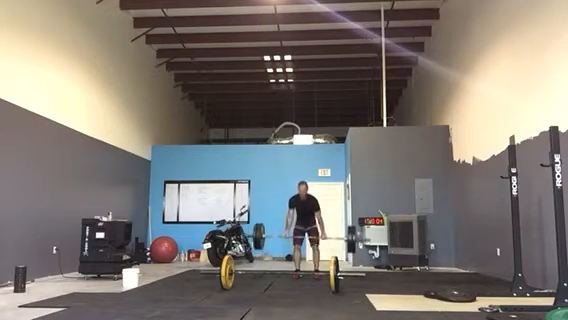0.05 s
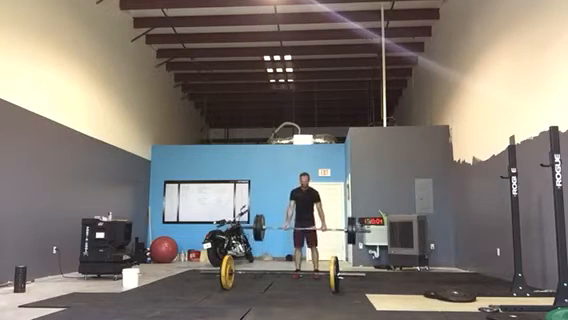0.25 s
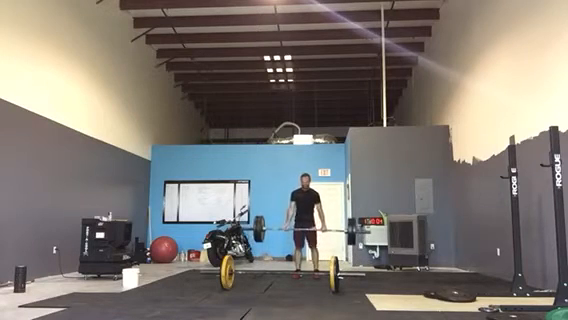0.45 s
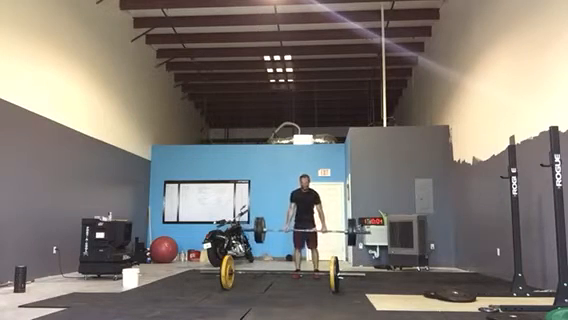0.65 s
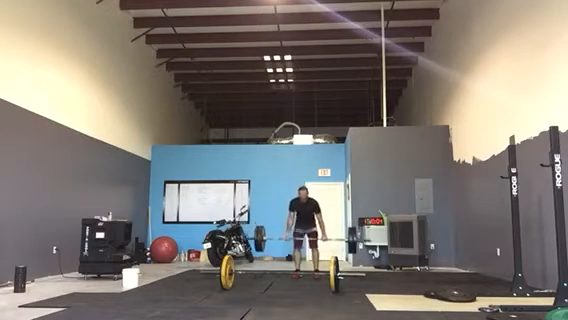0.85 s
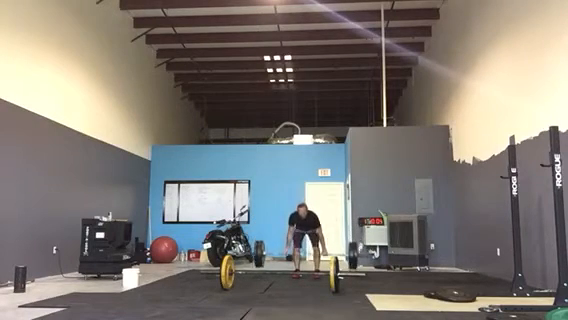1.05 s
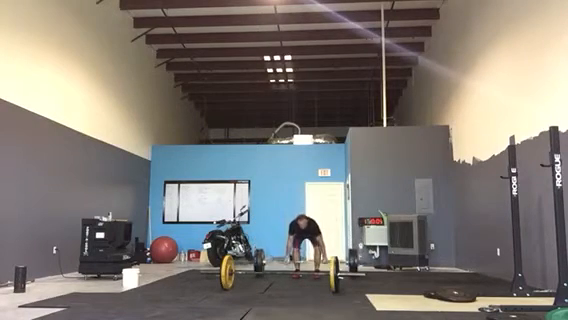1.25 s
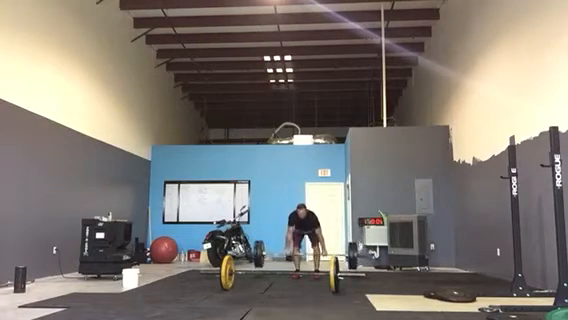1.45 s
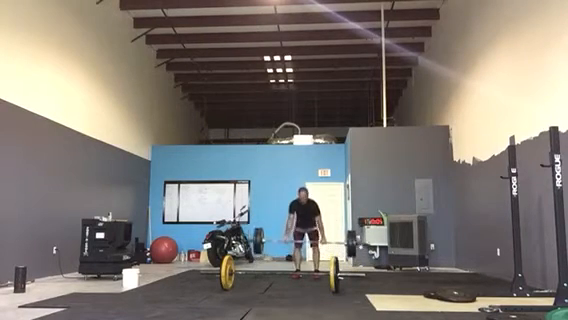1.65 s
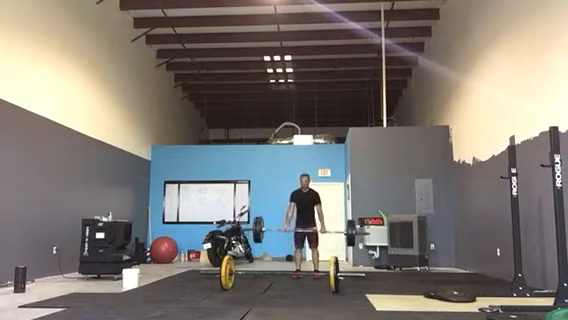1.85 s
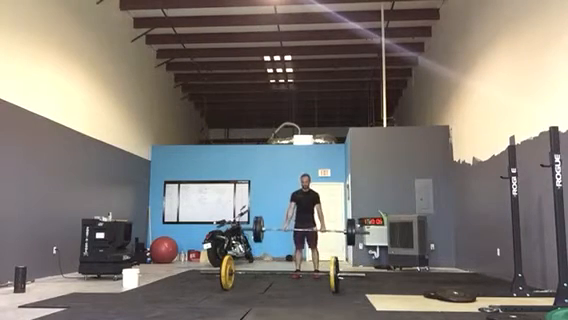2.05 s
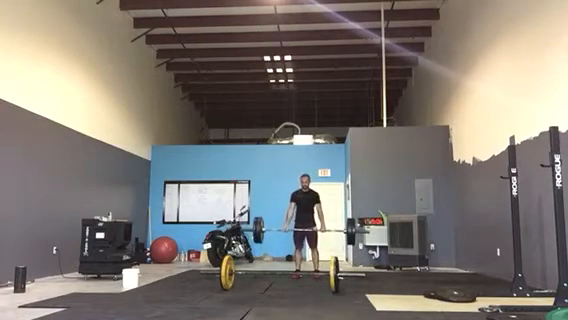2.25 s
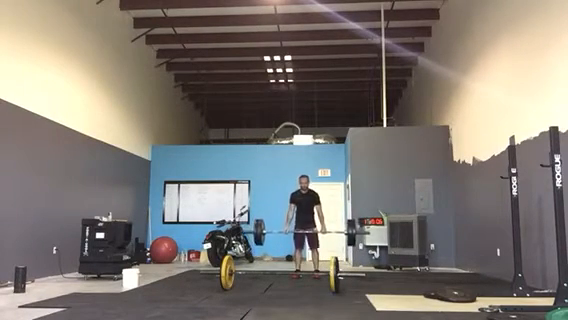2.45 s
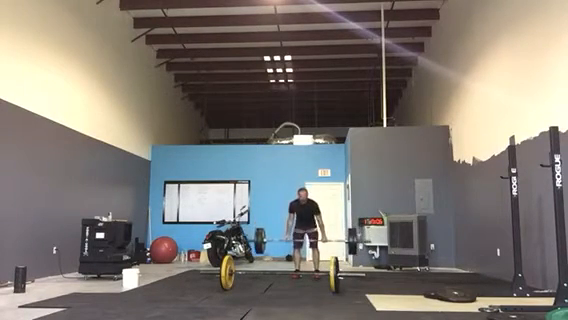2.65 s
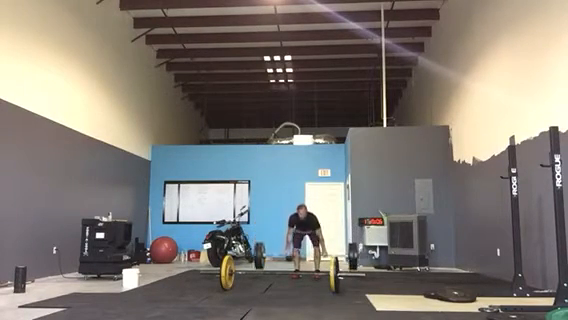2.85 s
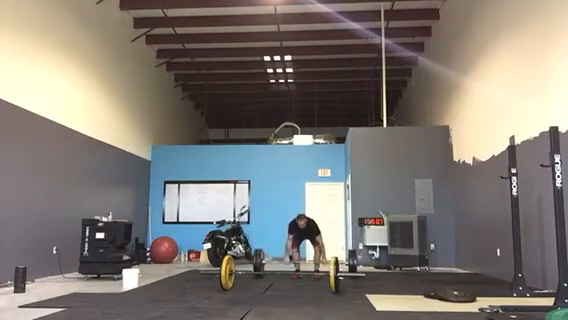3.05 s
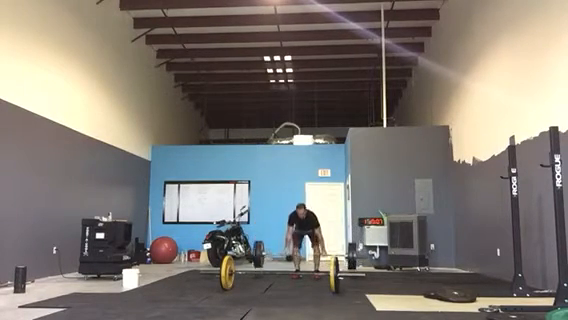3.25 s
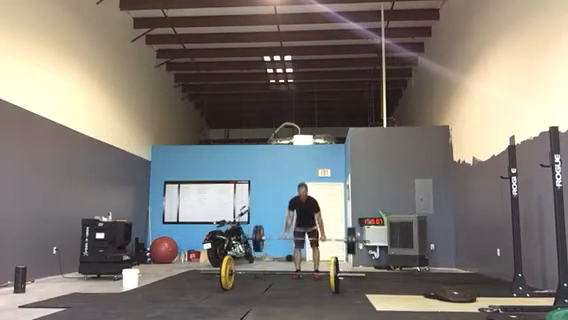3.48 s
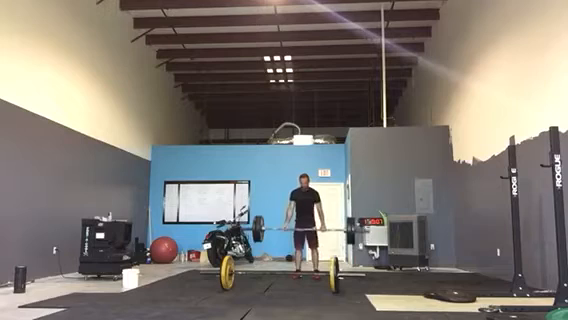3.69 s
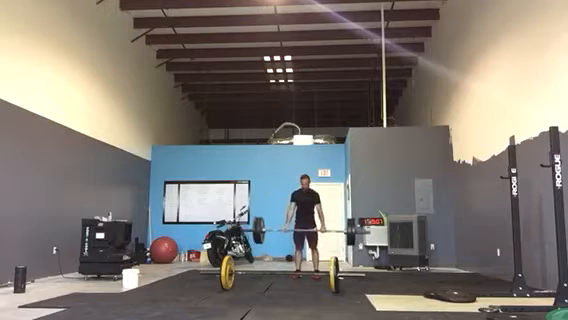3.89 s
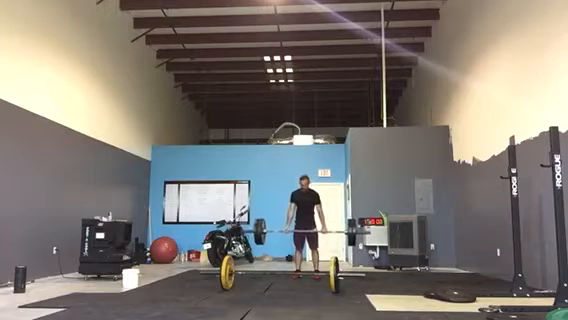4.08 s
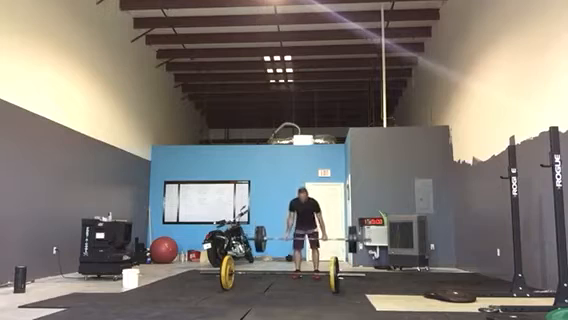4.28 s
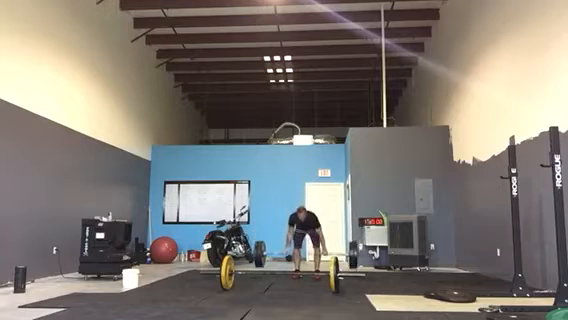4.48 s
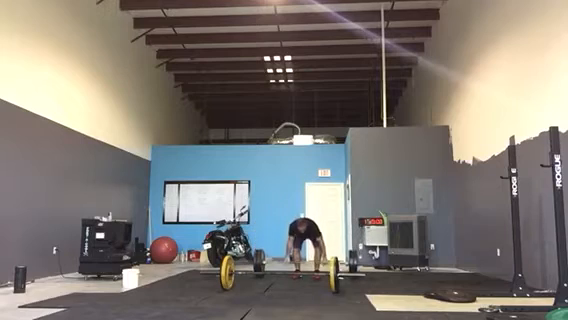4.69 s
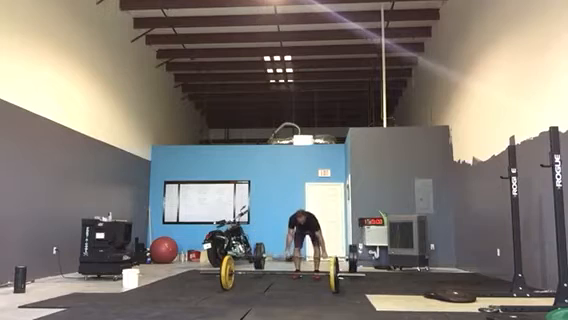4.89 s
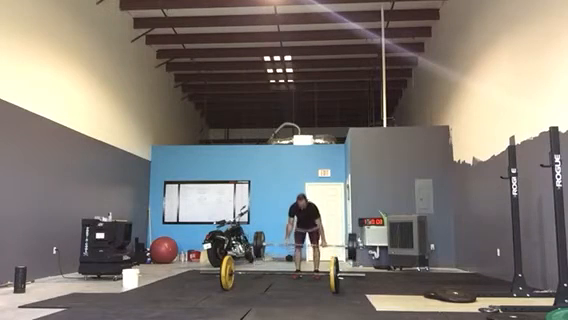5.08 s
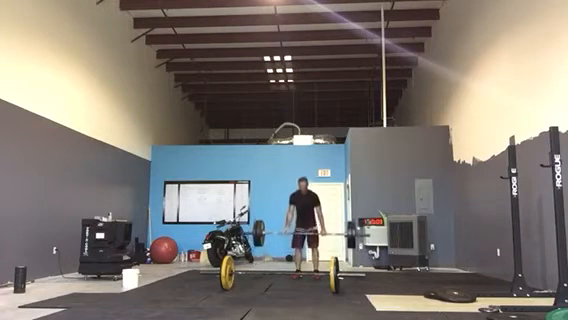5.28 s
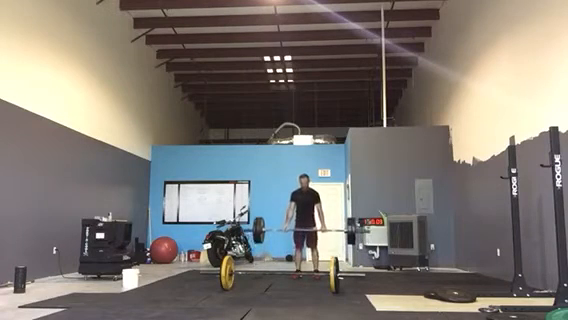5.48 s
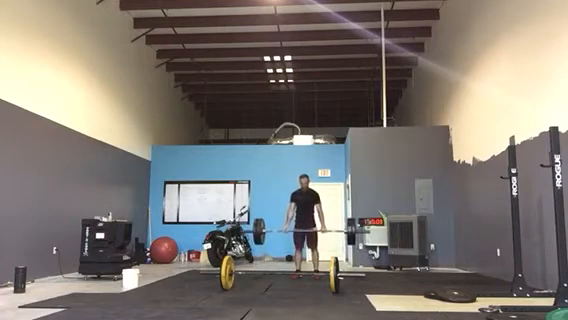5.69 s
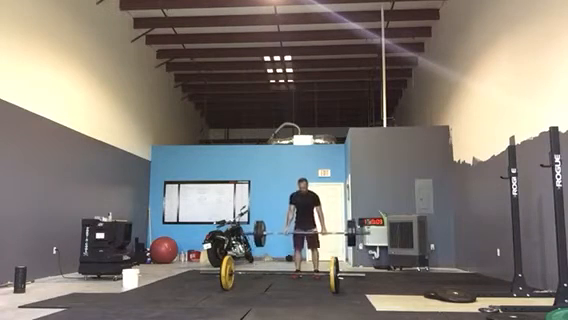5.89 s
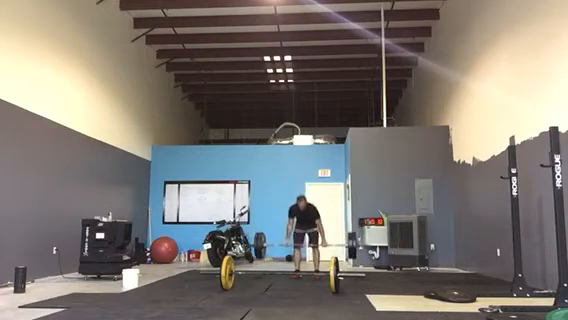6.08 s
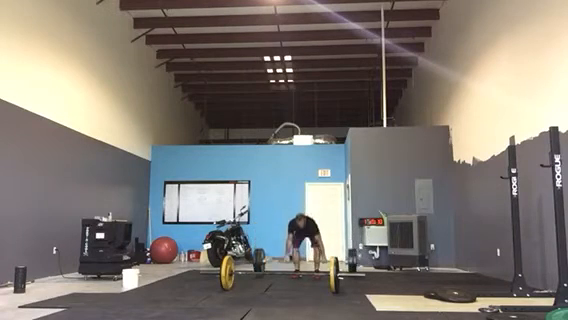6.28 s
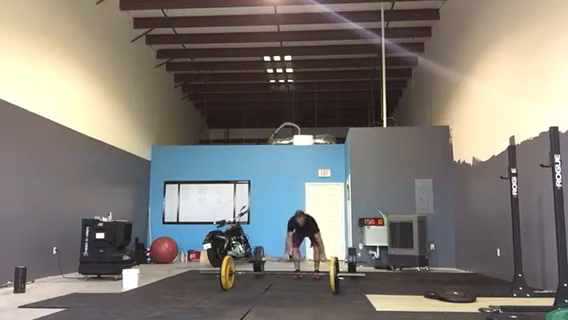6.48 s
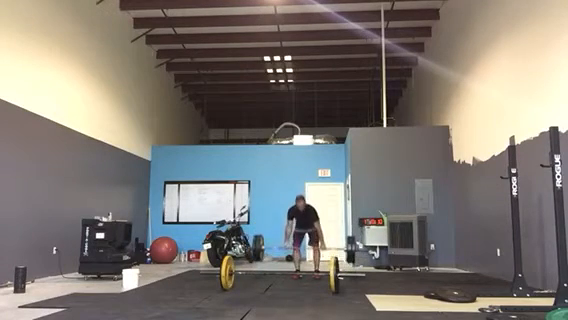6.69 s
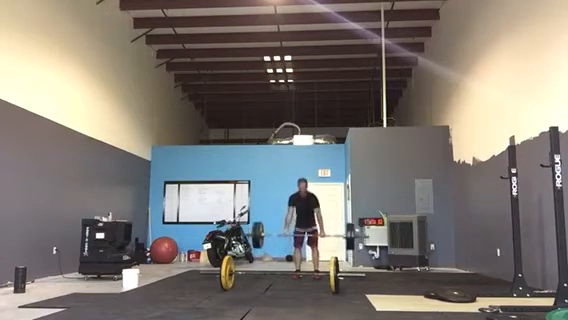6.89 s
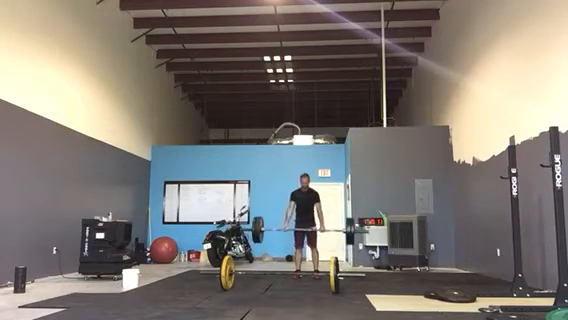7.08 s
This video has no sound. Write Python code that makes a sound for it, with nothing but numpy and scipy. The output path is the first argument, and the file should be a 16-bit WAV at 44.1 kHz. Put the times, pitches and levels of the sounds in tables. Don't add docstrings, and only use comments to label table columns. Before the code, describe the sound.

Low motor hum and airy fan rush run throughout. Faint sleeve clinks barely show between landings. Four short metallic clatters of a barbell break the drone, first with a soft rubber thud, then softer, then hard, then hardest with little thud. Each brings a low floor boom, wall returns and a fading hall tail. Heard from some distance on a small microphone whose automatic gain ducks briefly after each impact.

```python
import sys
import numpy as np
from scipy import signal
from scipy.fft import rfft, irfft
from scipy.io import wavfile
from scipy.ndimage import uniform_filter1d

SR = 44100
rng = np.random.default_rng(int(sys.argv[2]) if len(sys.argv) > 2 else 0)


def voltage_ratio(decibels):
    exponent = np.asarray(decibels, float) / 20
    return 10 ** exponent


def to_wav(sig):
    pcm = np.clip(np.atleast_2d(sig), -1, 1) * 32767
    pcm = np.round(pcm).astype(np.int16)
    wavfile.write(sys.argv[1], SR, pcm.T)


N = 314874

# t/s, strength/dB, plate ring/dB, bar ring/dB, rubber thud/dB
TOUCHDOWNS = [
    (1.3011, -20.5, 2.5, 3, 6),
    (3.101, -25.5, 1.5, 1.5, 4.5),
    (4.7503, -15.5, 2, -2, -6),
    (6.4534, -13.5, -2, -2, -14),
]
# t/s, peak level/dB
BLOWS = [(1.3015, -21), (1.3083, -20.5), (1.3183, -33), (1.3378, -19.5), (1.387, -16.5), (3.1063, -16.5),
         (3.122, -10), (3.1324, -21), (3.1663, -14), (4.747, -11), (4.7583, -14), (4.7703, -24),
         (4.7974, -8.5), (6.4560, -17), (6.4624, -25), (6.4787, -10)]
# t/s, peak level/dB
CLINKS = [
    (0.38, -77),
    (3.099, -36.5),
    (4.143, -75),
    (4.745, -38),
    (5.768, -83),
    (6.451, -40),
]
# f/Hz, width/Hz, level/dB
PLATE_MODES = [(1560, 600, -8), (1917, 160, -1.5), (2257, 135, 5), (2440, 120, -20), (2735, 85, -1),
               (2793, 99, -12.5), (2994, 162, -2.5), (3180, 160, -16)]
# f/Hz, width/Hz, level/dB
RUBBER_MODES = [(214, 46, -6), (306, 210, 5), (507, 600, -3.5), (1130, 630, 2)]
BAR_MODE_HZ = [3700, 4140, 4570, 5040, 5490, 5980, 6430, 6920, 7450, 8005, 8555, 9090, 9650, 10210, 10810,
               11470, 12040, 12670, 13300, 13920, 14580, 15220, 15620]
BAR_MODE_DB = [-8.5, -27.5, -13, -17.5, -8.5, -3, -2.5, -4.5, -6, -2.5, -2.5, -6.5, -7.5, -12.5, -12, -13,
               -14.5, -16, -16.5, -26, -24, -23.5, -30.5]
# f/Hz, density/(dB per Hz)
KNOCK_SPECTRUM = [(88, -41.5), (150, 6.5), (209, -0.5), (462, -8), (812, -12.5), (1130, -2.5), (1800, -6.5),
                  (2310, 0), (2700, 6.5), (4060, -46.5), (5230, -55), (6230, -9), (8330, -17.5),
                  (10100, -49.5), (15500, -54.5)]
# delay/s, level/dB, f/Hz, rise/cycles
BOOM_ARRIVALS = [(.005, -28.5, 77.2, 1.96), (.012, -34, 210, 4.2), (.087, -20.5, 74.3, 1.5),
                 (.15, -27.5, 68, 2.2), (.23, -67, 71, 0.91)]
# f/Hz, early t60/s, late t60/s, late level/dB
HALL_DECAY = [(198, 0.99, 1.15, -13.5), (706, 0.12, 0.41, 12), (1550, 0.17, 0.79, -2.5),
              (2590, 0.23, 1.4, -2), (4340, 0.23, 1.3, -10.5), (6980, 0.12, 1.44, 4),
              (9700, 0.82, 1.04, -21.5), (13800, 0.64, 0.6, -35)]
# multiple/1, level/dB rms, waver/Hz, unsteady share/1
BLADE_HARMONICS = [(1, -43.5, 3.6, 0.25), (2, -51.5, 5.2, 0.36), (3, -49.5, 4.7, 0.82), (4, -41, 2.8, 0.14),
                   (5, -50.5, 9.1, 0.63), (6, -49.5, 10, 0.37)]
# f/Hz, level/dB rms, waver/Hz, unsteady share/1
MOTOR_TONES = [(86.2, -55.5, 3.4, 0.8), (97.1, -52, 1.9, 0.28), (120.2, -44.5, 3.6, 0.19),
               (233.7, -54, 1.9, 0.32), (1675, -57.5, 19.5, 0.9), (1710, -63, 36, 0.51),
               (2390, -64, 12, 0.22)]
# f/Hz, density/(dB per Hz)
RUMBLE_SPECTRUM = [(15, -40), (35, -22), (50, -25.5), (60, -5.5), (75, -1.5), (110, -14.5), (130, -7.5),
                   (170, -8.5), (200, -4.5), (250, -5), (310, -4), (400, -9), (600, -18.5), (800, -62),
                   (1400, -120)]
# f/Hz, density/(dB per Hz)
RUSH_SPECTRUM = [(400, -8.5), (560, 0), (700, 2), (850, -4), (1100, -1), (1450, -8), (1900, -6.5),
                 (2400, -3.5), (2800, -9.5), (3000, -19.5), (3200, -29), (3600, -31.5), (4000, -54),
                 (5000, -57.5)]
# f/Hz, density/(dB per Hz)
HISS_SPECTRUM = [(2500, -41), (3600, -12), (4100, -6), (4800, -8.5), (5600, -4.5), (6900, 0.5), (8500, -7),
                 (10500, -11), (13000, -15.5), (15600, -21), (16200, -58)]

MEAN_STRENGTH_DB = -18.5
LEAD_S, RATTLE_S = 0.004, 0.053
CLINK_RISE_S, STEEL_RISE_S = 0.002, 0.004
BAR_WIDTH_HZ = 125
KNOCK_DB, KNOCK_FOLLOWS = -27, 0.57
BOOM_DB, BOOM_FOLLOWS, BOOM_FOLLOWS_THUD = 1, 0.45, 0.11
ECHO_DB, ECHO_FOLLOWS = -0.4, 0.21
TOP_MODES_DB, TOP_FOLLOWS_BAR = -0.1, 0.7
FADE_DB, FADE_S = 6.0, 0.69
BLADE_HZ = 68.42
RUMBLE_DB, RUSH_DB, RUSH_FLICKER_DB, HISS_DB = -39.5, -45.5, 0.6, -77


def barbell():
    out = np.zeros(N)
    for s, strength_db, plate_db, bar_db, thud_db in TOUCHDOWNS:
        swing_db = strength_db - MEAN_STRENGTH_DB
        start_s = s - LEAD_S
        rattle = clatter(start_s, strength_db, plate_db, bar_db, thud_db)
        add(out, start_s, hall(rattle))
        first_db = BOOM_DB + BOOM_FOLLOWS * swing_db + BOOM_FOLLOWS_THUD * thud_db
        add(out, s, boom(first_db, ECHO_DB + ECHO_FOLLOWS * swing_db))
    return out + hall(sleeve_clinks())[:N]


def clatter(start_s, strength_db, plate_db, bar_db, thud_db):
    t = np.arange(SR // 2) / SR
    push = force(start_s, strength_db, t)
    hit = rng.random(len(t)) < 2500 / SR
    grain_db = 1.5 * rng.exponential(1, len(t))
    grains = rms_one(hit * rng.standard_normal(len(t)) * voltage_ratio(grain_db))
    clicks = grains * push + 1e-18

    knock_db = KNOCK_DB + KNOCK_FOLLOWS * (strength_db - MEAN_STRENGTH_DB)
    knock = voltage_ratio(knock_db) * push * coloured(KNOCK_SPECTRUM, len(t))
    thud = struck(clicks, RUBBER_MODES, 1.2)
    plates = struck(clicks, PLATE_MODES, 1.2)

    sharp = grains * np.clip(t / STEEL_RISE_S, 0, 1) ** 2 * np.exp(-t / 0.011) + 1e-18
    low_modes, top_modes = bar_modes()[:13], bar_modes()[13:]
    bar = struck(clicks, low_modes, 1.2)
    bar += voltage_ratio(TOP_MODES_DB + TOP_FOLLOWS_BAR * bar_db) * struck(clicks + sharp, top_modes, 1.2)

    ringing = voltage_ratio(thud_db - 8.0) * thud + voltage_ratio(plate_db + 6.0) * plates + voltage_ratio(bar_db - 1.0) * bar
    return knock + voltage_ratio(strength_db) * ringing


def force(start_s, strength_db, t):
    out = (0.65 + np.clip(t / 0.049, 0, 1)) * np.exp(-(t / RATTLE_S) ** 1.26)
    for s, level_db in BLOWS:
        since = t - (s - start_s)
        begun = (since >= 0) * (s >= start_s)
        out += voltage_ratio(level_db - strength_db + 1.0) * begun * np.exp(-np.abs(since) / 0.0033)
    return out * np.clip(0.24 + t / 0.016, 0, 1)


def sleeve_clinks():
    out, t = np.zeros(N), np.arange(SR // 10) / SR
    for s, peak_db in CLINKS:
        tap = rng.standard_normal(len(t)) * np.exp(-t / 0.011) * np.clip(t / CLINK_RISE_S, 0, 1)
        add(out, s, voltage_ratio(peak_db + 23) * struck(tap, bar_modes(), 3.6))
    return out


def bar_modes():
    return [(hz, BAR_WIDTH_HZ, db) for hz, db in zip(BAR_MODE_HZ, BAR_MODE_DB)]


def struck(clicks, modes, spread_db):
    strengths = voltage_ratio(spread_db * rng.standard_normal(len(modes)))
    out = np.zeros(len(clicks))
    for strength, (hz, width_hz, level_db) in zip(strengths, modes):
        once = resonance(clicks, hz, width_hz)
        out += strength * voltage_ratio(level_db) * resonance(once, hz, 1.47 * width_hz)
    return out


def resonance(x, hz, width_hz):
    r = np.exp(-np.pi * width_hz / SR)
    zeros = np.array([1, 0, -1]) * (1 - r * r) / 2
    poles = [1, -2 * r * np.cos(2 * np.pi * hz / SR), r * r]
    return signal.lfilter(zeros, poles, x)


def boom(first_db, echo_db):
    out, t = np.zeros(SR // 2), np.arange(SR // 5) / SR
    for k, (delay_s, level_db, hz, cycles) in enumerate(BOOM_ARRIVALS):
        rise = t * hz / cycles
        swing = (rise * np.exp(1 - rise)) ** 1.63 * np.sin(2 * np.pi * hz * t)
        path_db = echo_db if k > 1 else first_db
        add(out, delay_s, voltage_ratio(level_db + path_db) * swing)
    return out


def hall(x):
    t, points = np.arange(SR * 3 // 2) / SR, np.array(HALL_DECAY)
    edges_hz = 100 * 2 ** np.arange(0, 7.6, 0.5)
    echoes = np.zeros(len(t))
    for low, high in zip(edges_hz, edges_hz[1:]):
        log_centre = np.log(low * high) / 2
        early_s, late_s, late_db = [np.interp(log_centre, np.log(points[:, 0]), c) for c in points.T[1:]]
        band_pass = signal.butter(2, [low, high], "band", fs=SR, output="sos")
        band = signal.sosfilt(band_pass, rng.standard_normal(len(t)))
        echoes += band * (voltage_ratio(-60 * t / early_s) + voltage_ratio(late_db - 60 * t / late_s))
    echoes *= voltage_ratio(-36.5 - FADE_DB * (t / FADE_S) ** 3) * np.clip(t / 0.0039, 0, 1)
    echoes[0] = voltage_ratio(-6)
    return signal.fftconvolve(x, echoes)


def fan():
    t = np.arange(N) / SR
    out = voltage_ratio(RUMBLE_DB) * coloured(RUMBLE_SPECTRUM, N)
    out += voltage_ratio(HISS_DB) * coloured(HISS_SPECTRUM, N)
    out += voltage_ratio(RUSH_DB + RUSH_FLICKER_DB * drift(5.9)) * coloured(RUSH_SPECTRUM, N)
    blade_tones = [(k * BLADE_HZ, *rest) for k, *rest in BLADE_HARMONICS]
    for hz, level_db, waver_hz, share in blade_tones + list(MOTOR_TONES):
        wobble = 1 + share * (drift(waver_hz) + 1j * drift(waver_hz))
        out += voltage_ratio(level_db) * np.real(wobble * np.exp(2j * np.pi * hz * t))
    return out


def drift(rate_hz):
    r = np.exp(-2 * np.pi * rate_hz / SR)
    noise = rng.standard_normal(N + SR)
    return rms_one(signal.lfilter([1], [1, -2 * r, r * r], noise)[SR:])


def coloured(spectrum, size):
    hz = np.maximum(np.arange(size // 2 + 1) * SR / size, 1)
    points = np.array(spectrum)
    gain = voltage_ratio(np.interp(np.log(hz), np.log(points[:, 0]), points[:, 1]))
    return rms_one(irfft(rfft(rng.standard_normal(size)) * gain, size))


def rms_one(x):
    return x / np.sqrt(np.mean(x ** 2) + 1e-20)


def add(out, s, piece):
    i = round(s * SR)
    out[i:i + len(piece)] += piece[:len(out) - i]


def scene():
    mix = barbell() + fan()
    return (mix * np.clip(np.arange(N) / 60, 0, 1))[None]


def low_pass(x):
    return signal.sosfilt(signal.butter(12, 15760, fs=SR, output="sos"), x)


def record(dry):
    level_db = 10 * np.log10(uniform_filter1d(dry[0] ** 2, size=1323) + 1e-12)
    over_db = np.maximum(level_db + 29, 0)
    climb_db = 19.0 * np.arange(N) / SR
    held_db = np.maximum.accumulate(over_db + climb_db) - climb_db
    r = np.exp(-1 / (0.03 * SR))
    gain = voltage_ratio(-0.35 * signal.lfilter([1 - r], [1, -r], held_db))
    heard = signal.sosfilt(signal.butter(2, 22, "high", fs=SR, output="sos"), dry)
    heard = signal.sosfilt(signal.cheby2(20, 50, 16150, fs=SR, output="sos"), heard)
    return low_pass(heard * gain)


dry = scene()
out = record(dry)
to_wav(out)
```